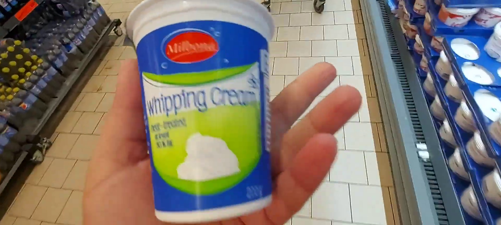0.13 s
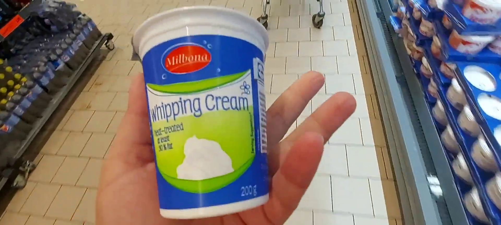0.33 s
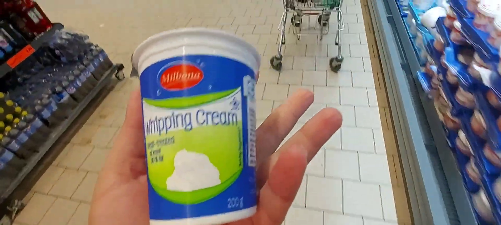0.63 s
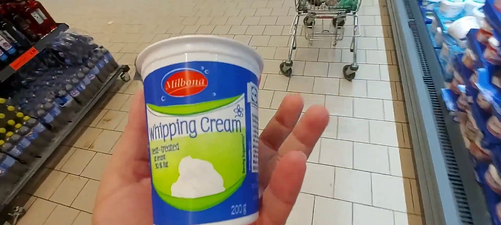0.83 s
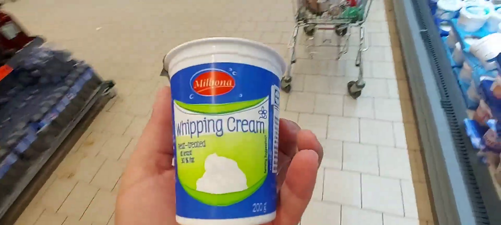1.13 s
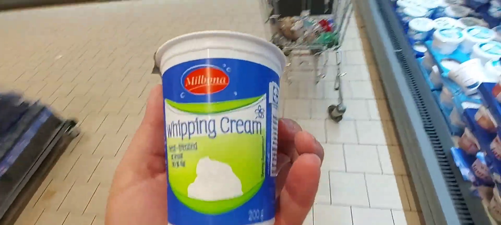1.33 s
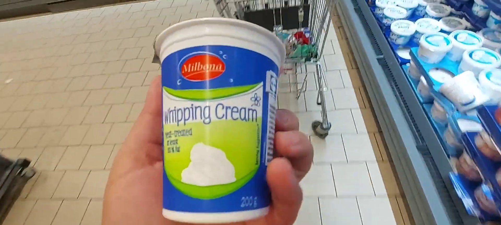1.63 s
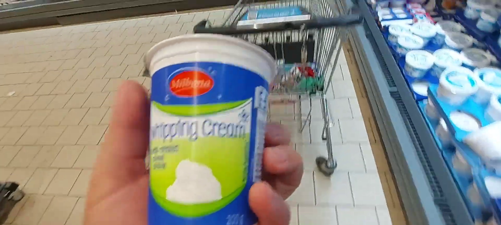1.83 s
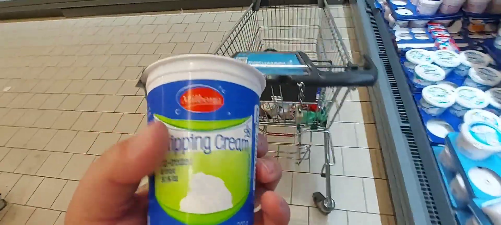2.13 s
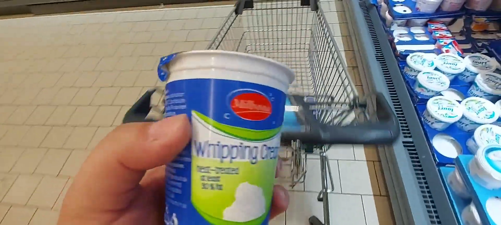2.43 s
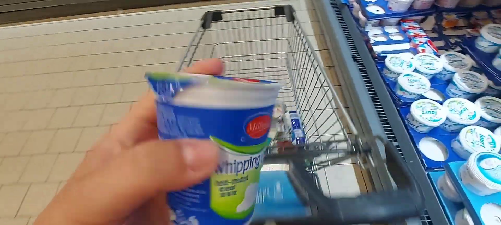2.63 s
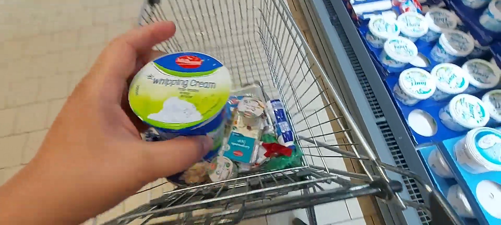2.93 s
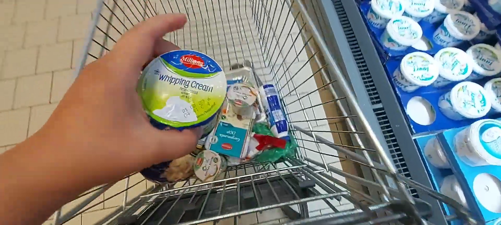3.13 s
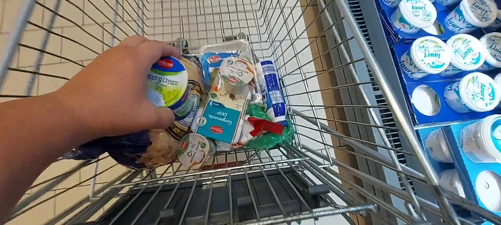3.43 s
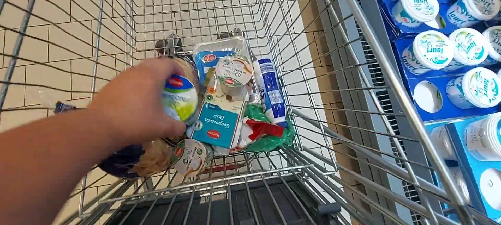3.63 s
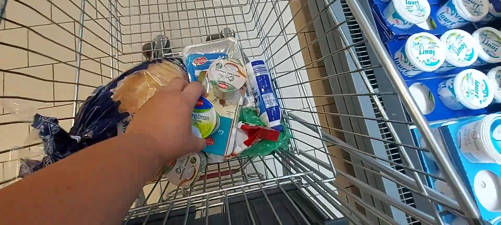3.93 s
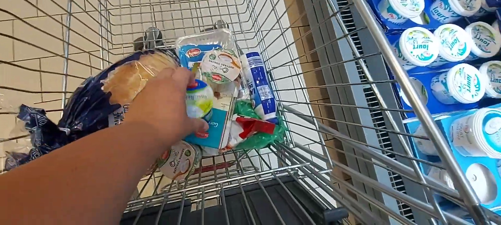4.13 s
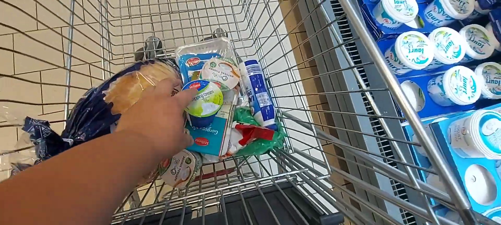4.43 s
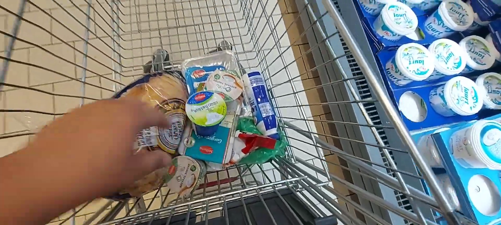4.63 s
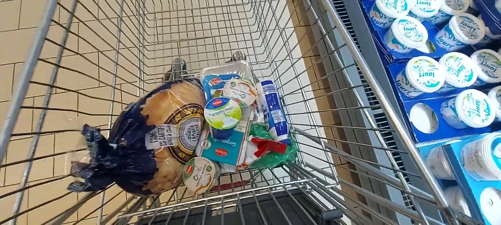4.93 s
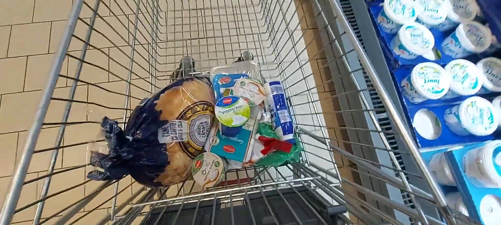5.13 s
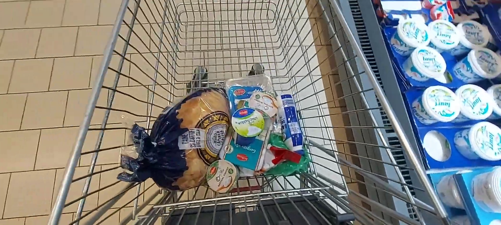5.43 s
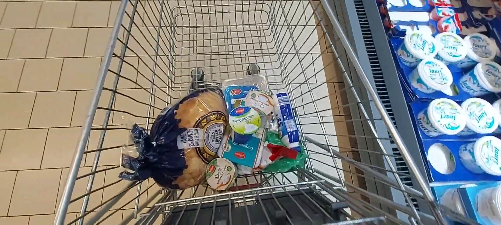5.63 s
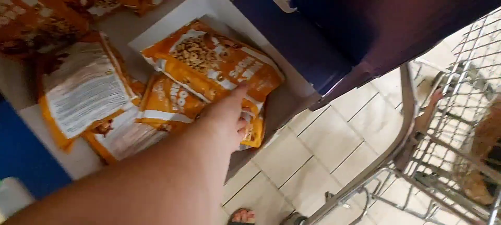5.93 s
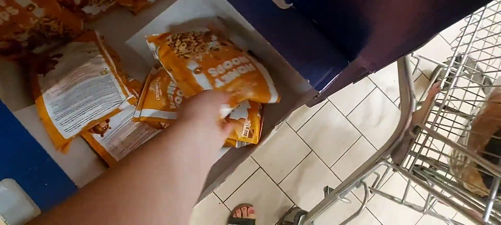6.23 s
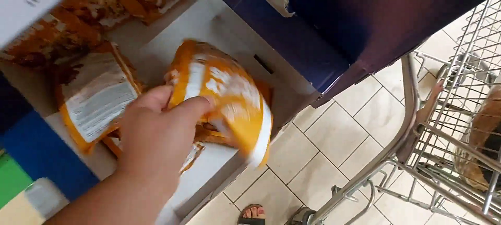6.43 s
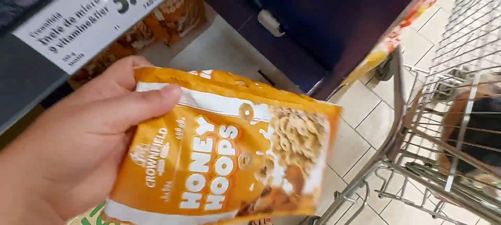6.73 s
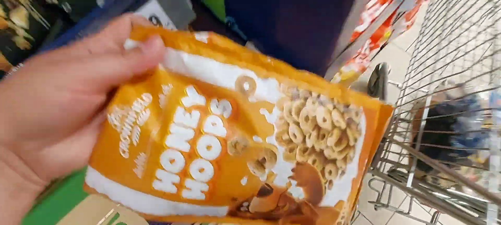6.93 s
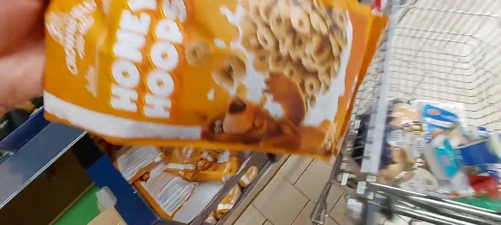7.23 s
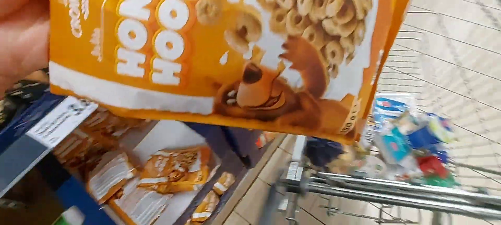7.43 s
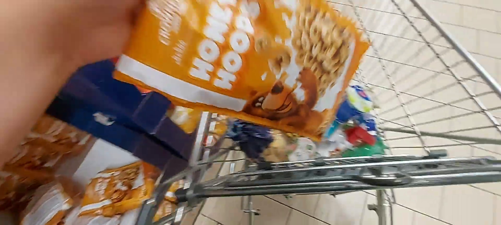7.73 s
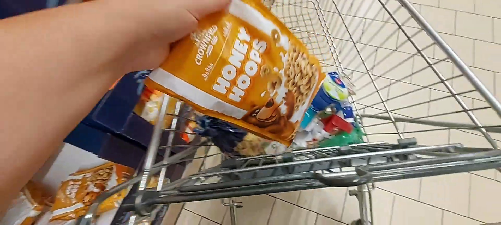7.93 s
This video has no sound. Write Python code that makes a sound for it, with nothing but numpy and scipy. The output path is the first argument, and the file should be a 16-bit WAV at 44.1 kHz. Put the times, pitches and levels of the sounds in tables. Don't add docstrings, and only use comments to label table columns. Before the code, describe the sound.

Low fan drone and chiller air roar in a supermarket aisle, a plastic tub clacks into a wire trolley, then a bag crackles loudly.

```python
import sys
import numpy as np
from scipy import signal
from scipy.fft import rfft, irfft
from scipy.io import wavfile
from scipy.ndimage import uniform_filter1d

SR = 44100
rng = np.random.default_rng(int(sys.argv[2]) if len(sys.argv) > 2 else 0)


def invert_db(level):
    return 10 ** (np.asarray(level, dtype=float) / 20)


def master(y):
    cut = np.clip(np.atleast_2d(y).T, -1, 1)
    pcm = np.round(cut * 32767)
    wavfile.write(sys.argv[1], SR, pcm.astype(np.int16))


N = 356416
TIME = np.arange(N) / SR
FREQ = np.fft.rfftfreq(N, 1 / SR)
HARD_DB = -34


def along_hz(points, hz):
    f, value = np.transpose(points)
    return np.interp(np.log(np.maximum(hz, 1)), np.log(f), value)


def unit(x):
    return x / np.sqrt(np.mean(x ** 2))


def walk(rate):
    k = int(SR / rate)
    held = np.repeat(rng.standard_normal(400), k)[:N]
    return 1.292 * uniform_filter1d(uniform_filter1d(held, k), k)


def sides(db):
    return invert_db(np.array([db, -db]) / 2)


def lag(samples):
    return np.exp(-2j * np.pi * FREQ * samples / SR)


def passing(db, at_s, reach_s):
    stops_s, fall_db = 3.88, 22
    distance = (np.minimum(TIME, stops_s) - at_s) / reach_s
    return db - fall_db * np.log10(1 + distance ** 2)


def swells(rows):
    power = 0
    for s, db, fade_s in rows:
        age = (TIME - s) / fade_s
        power = power + invert_db(db) ** 2 * np.exp(-2 * np.maximum(age, -age / 0.67) ** 1.45)
    return power


def air(colour, alike_hz, flicker_db, tilt_db, ref_hz):
    alike = .65 / (1 + (FREQ / alike_hz) ** 10.0) + .33 / (1 + (FREQ / 4000) ** 1.2)
    mid, side = rfft(rng.standard_normal((2, N))) * np.sqrt([1 + alike, 1.001 - alike])
    both = np.array([(mid + side) * lag(7.8), mid - side]) * colour
    inside = (FREQ > ref_hz[0]) & (FREQ < ref_hz[1])
    both /= np.sqrt(2 * np.sum(abs(both[0, inside]) ** 2)) / N
    out = 0
    for octave in range(10):
        centre = 31.25 * 2 ** octave
        share = np.clip(1 - abs(np.log2(np.maximum(FREQ, 1) / centre)), 0, 1)
        level_db = flicker_db * walk(8) + tilt_db * (centre > 400)
        out = out + irfft(both * share, N) * invert_db(level_db)
    return out


def fans():
    # blade rate in Hz, level in dB when nearest, passed at s, reach of walking in s,
    # moment in s where the pair cancels.
    twin_fans = [(92.25, -22, .4, 1.35, 1.83), (89.95, -24.5, 3.0, 1.05, 1.83),
                 (117.65, -29, 2.9, 2.4, 3.66), (116.62, -35, 2.5, 5.0, 3.66)]
    # blade rate in Hz, then levels in dB of blade orders 1, 2, ..
    other_fans = [
        (54.4, [0]),
        (116.7, [-30, -12.5, -13]),
        (140.1, [2, -2.5, -28, -17.5, -46]),
        (89.8, [-47, 0, -7, -4, -12.5]),
        (92.7, [-40, -9.5, 0]),
        (116, [-40, 0]),
    ]
    # level in dB when nearest, passed at s, reach in s.
    fan_places = [(-40, 1.0, 13), (-30.5, 3.4, 3.4), (-33.5, 2.42, 1.25), (-35, 3.9, 2.4),
                  (-37.5, 0.4, 0.97), (-35.5, 0.67, 0.53)]
    out = 0
    for sign, (hz, *place, opposed_s) in zip((1, -1, 1, -1), twin_fans):
        level = invert_db(passing(*place) + 0.59 * walk(3.68))
        out = out + sign * level * np.sin(2 * np.pi * hz * (TIME - opposed_s))
    for (blade_hz, orders), place in zip(other_fans, fan_places):
        turn = 2 * np.pi * np.cumsum(blade_hz * (1 + 0.00398 * walk(3))) / SR
        near_db = passing(*place) + 1.45 * walk(2.35)
        for k, order_db in enumerate(orders):
            level = invert_db(near_db + order_db + 2.56 * k ** .5 * walk(6))
            out += level * np.sin((k + 1) * turn + k * k)
    late = np.roll(out, 14)
    return np.sqrt(2) * np.array([late, out]) * sides(-1.7)[:, None]


def whine():
    # line in Hz, level in dB, start in s, end in s.
    motor_lines = [(2627, -57, .5, 1.05), (2670, -63, 0, 1.3), (2722, -64, .6, 1.5), (2763, -61, 0, 1.75),
                   (2758, -56, 3.2, 3.7), (2690, -59, 4.6, 5.15), (2676, -59, 2.5, 6.2),
                   (2697, -60, 1.7, 6.2), (2763, -61, 1.9, 3.2), (2680, -59, 2.4, 3.0),
                   (12000, -71, 3.6, 4.6), (2589, -58, 3.7, 6.2), (2789, -59, 3.8, 6.2),
                   (2428, -62, 3.7, 6.2), (2390, -64, 2.0, 2.4), (11100, -69, 2.4, 4.6),
                   (11000, -70, 3.4, 5.3)]
    out = 0
    for hz, db, start, end in motor_lines:
        gate = np.clip(np.minimum(TIME - start, end - TIME) / .15 + .5, 0, 1)
        sag = .012 * (1 - gate) * (TIME > end - .1)
        turn = 2 * np.pi * np.cumsum(hz * (1 + .0004 * walk(25) - sag)) / SR
        ports = np.sin(turn + np.array([[0], [np.pi / 2]]))
        out = out + gate * invert_db(db + 2.6 * walk(7.04)) * ports * np.sqrt(2)
    return out * sides(-5.0)[:, None] * invert_db(1.6)


def grille():
    band = np.exp(-((FREQ - 433) / 112) ** 2)
    ports = np.array([lag(9), lag(0)])
    noise = unit(irfft(rfft(rng.standard_normal(N)) * band * ports, N))
    return invert_db(passing(-40.5, 3.84, 1.15) + 1.5 * walk(3.05)) * noise


def scuffs():
    # time in s, peak level in dB, fade in s.
    steps = [(.66, -64, .06), (.88, -59, 0.046), (1.69, -54, 0.039), (2.31, -50, 0.059), (2.99, -48.5, 0.1),
             (3.24, -52, .03), (3.33, -54, .03), (4.29, -52, 0.036), (4.48, -62, 0.036),
             (4.63, -53.5, 0.063), (5.08, -58, 0.11), (5.23, -59, .05), (5.8, -60, 0.13)]
    cloth = invert_db(passing(-57.5, 3.9, 4.9) + 1.9 * walk(11))
    return np.sqrt(cloth ** 2 + swells(steps))


def chiller():
    # frequency in Hz, level in dB per Hz.
    chiller_air = [(30, -37), (93, -5.5), (177, -11.5), (289, -8), (611, -24.5), (946, -23.5), (1220, -31),
                   (2900, -41), (5000, -51.5), (8100, -49), (9600, -57), (12000, -49), (15750, -53.5),
                   (15900, -85)]
    # frequency in Hz, left minus right in dB.
    chiller_side = [(100, -4), (400, 0.5), (1300, -2), (3000, -4.5), (8000, -12.5), (15000, -8.5)]
    colour = invert_db(along_hz(chiller_air, FREQ)) * sides(along_hz(chiller_side, FREQ))
    buffet_db = 1.4 * walk(14)
    roar = invert_db(passing(-27, 5.65, 13.5) + buffet_db - 2.5) * air(colour, 700.0, 1.0, -buffet_db, (190, 500))
    cloth_colour = colour * (FREQ > 2000) / (1 + (FREQ / 11000) ** 4)
    scuff = scuffs() * invert_db(-2.0) * air(cloth_colour, 800., .8, 0, (3200, 9000))
    return roar + scuff + fans() + whine() + grille()


def jet():
    band = np.exp(-((FREQ - 10990) / np.where(FREQ < 10990, 220, 400)) ** 2)
    band = band + invert_db(-7) * np.exp(-((FREQ - 11800) / 500) ** 2)
    swell_db = 4 * np.clip((TIME - 5.3) / .4 + .5, 0, 1)
    level = invert_db(passing(-55.5, 3.3, 6.0) + swell_db + 1.3 * walk(5.97))
    hiss = unit(irfft(rfft(rng.standard_normal((2, N))) * band, N))
    return level * hiss * sides(0.71)[:, None]


def film(rough_db, top_db):
    # frequency in Hz, level in dB per Hz.
    film_colour = [(180, -59), (300, 0), (379, -8.5), (531, -12.5), (907, -7.5), (1210, -17), (1380, -12),
                   (1630, -12.5), (2170, -13), (6030, -19.5), (7630, -14.5), (9180, -18), (11200, -15.5),
                   (15750, -20), (15900, -38), (17000, -55)]
    part_edges_hz = [250, 1200, 5000, SR]
    roughness = uniform_filter1d(rng.exponential(size=N), size=12)
    grains = rng.standard_normal((2, N)) * invert_db(rough_db * roughness)
    alike = 0.81 / (1 + (FREQ / 1200) ** 4.6) + 0.097
    left, right = rfft(grains) * invert_db(along_hz(film_colour, FREQ) + top_db * (FREQ > 8750))
    tone = np.array([left, alike * left * lag(10.5) + np.sqrt(1 - alike ** 2) * right])
    above = [np.clip(np.log2(np.maximum(FREQ, 1) / hz) / .5 + .5, 0, 1) for hz in part_edges_hz]
    return [unit(irfft(tone * np.sqrt(lo - hi), N)) for lo, hi in zip(above, above[1:])]


def lasting(rows, length_s):
    return [(*row, length_s) for row in rows]


def cracks(rows, spike, tail_db, tail_s, sharp, pan_db):
    lead_s = 0.011
    out, since = np.zeros((2, N + SR)), TIME[:SR // 5] - lead_s
    age = np.maximum(since, 0)
    creak = invert_db(-21) * np.exp(-abs(since) / .0025)
    dull, middle, bright = film(rough_db=8.0, top_db=-1.0)
    for s, db, hz, dull_db, bright_db, length in rows:
        at = int((s - lead_s) * SR)
        burst = np.exp(-(age / max(length, .0007)) ** 1.01)
        burst = burst + spike * np.exp(-age / 0.00089) + invert_db(tail_db - 60 * age / tail_s)
        burst = burst * np.minimum(age / 0.00096, 1) + creak * min(length / 0.0035, 1)
        burst = burst[:N - at]
        span = slice(at, at + len(burst))
        patch = signal.iirpeak(hz, sharp * (0.0038 / length) ** 0.53, fs=SR)
        ring = signal.lfilter(*patch, burst * (middle + bright)[:, span])
        ring = ring + invert_db(-14.) * min(length / .004, 1) ** 2 * burst * middle[:, span]
        parts = ring, burst * dull[:, span], burst * bright[:, span]
        for part, part_db in zip(parts, (0, dull_db, bright_db)):
            out[:, span] += invert_db(db + part_db) * part / abs(part.mean(axis=0)).max()
    return out[:, :N] * sides(pan_db)[:, None]


def tub():
    # time in s, peak in dB, ringing in Hz, dull part in dB, bright part in dB.
    tub_knocks = [(1.667, -35, 2800, -8, -10), (1.676, -36, 2200, -8, -10), (1.685, -35, 3000, -12, -12),
                  (1.691, -36, 4000, -12, -14), (1.704, -42, 3200, -12, -14), (2.991, -31, 1440, -4, -16),
                  (2.998, -35, 2000, -6, -14), (3.2265, -24, 2570, 3.5, -4), (3.2305, -29, 3000, -4, -9),
                  (3.2375, -34, 2600, -6, -10), (5.462, -39, 1398, -8, -13)]
    tub_ticks = [
        (1.6633, -26.5, 2100, 1, -20),
        (2.9025, -33, 2400, -12, -20),
        (3.2088, -28, 3200, 5, -11),
        (3.2135, -24, 1510, -6, -2),
        (3.2497, -36, 2780, -6, -12),
        (3.3748, -27, 6400, -25, -10),
        (3.3746, -30, 3660, -25, -25),
        (4.2848, -30, 4600, 4, 2),
        (5.0975, -40, 3620, -25, -25),
        (5.215, -30, 1900, -9, -23),
    ]
    tub_scrapes = [
        (4.299, -39, 2900, -20, -25),
        (4.318, -39, 3000, -20, -25),
        (4.466, -36, 3100, -20, -25),
        (4.481, -38, 3000, -20, -25),
    ]
    rows = lasting(tub_knocks, .003) + lasting(tub_ticks, .0017) + lasting(tub_scrapes, .014)
    return cracks(rows, spike=0.79, tail_db=-20.0, tail_s=0.2, sharp=2.6, pan_db=-6.5)


def pings():
    # time in s, peak in dB, mode in Hz, t60 in s.
    corner_pings = [(3.3749, -18, 6400, .006), (5.2126, -24, 4150, .006), (5.2125, -21, 3000, .007),
                    (1.663, -27, 1900, .005), (1.6634, -26, 2900, .005), (1.6635, -29, 4000, .005),
                    (3.2093, -17, 2450, .007), (7.558, -26, 1500, .008), (7.5738, -27, 700, .015),
                    (6.8641, -18, 3400, .008), (6.9677, -8, 2650, .009), (6.9686, -15, 3180, 0.006),
                    (7.8629, -24, 1150, .01), (7.8633, -21, 750, .012), (7.863, -29, 1550, .008),
                    (7.036, -29, 420, .025), (7.2623, -34, 900, .012), (7.6753, -28, 800, .012)]
    further_pops = [(6.0849, -19, 8140, .004), (6.09, -12, 3420, .005), (6.1066, -17, 3530, .005),
                    (6.1164, -16, 13000, .003), (6.1178, -16, 5430, .005), (6.1576, -7, 12900, .003),
                    (6.1655, -20, 4350, .005), (6.1694, -22, 8230, .004), (6.1695, -24, 4180, .005),
                    (6.2288, -6.5, 8140, .005), (6.2314, -17, 3450, .006), (6.2906, -25, 4000, .005),
                    (6.312, -16, 7970, .005), (6.3292, -22, 2800, .006), (6.3998, -12, 8070, .006),
                    (6.4125, -9, 12100, .004), (6.4824, -25, 3450, .005), (6.4847, -20, 3020, .006),
                    (6.5344, -8, 4250, .006), (6.5735, -18, 8960, .004), (6.584, -23, 7190, .004),
                    (6.6132, -24, 3270, .005), (6.6359, -26, 3060, .005), (6.7439, -19, 3270, .006),
                    (6.7513, -11, 4100, .006), (6.7511, -15, 7590, .005), (6.7942, -17, 2900, .006),
                    (6.8649, -10, 8230, .004), (6.8737, -23, 3530, .005), (6.8762, -16, 3890, .005),
                    (6.9041, -13, 2540, .007), (3.2272, -26, 8600, .005), (3.2295, -26, 4200, .005),
                    (3.3749, -17, 3700, .006), (3.3749, -19, 7500, .005), (4.2857, -18, 4200, .006),
                    (4.2851, -20, 5700, .005), (3.3749, -21, 5400, .005), (2.9915, -28, 1250, .006),
                    (2.9918, -25, 2000, .006), (3.2092, -28, 3700, .005), (6.9682, -22, 3900, .005),
                    (6.9674, -23, 5600, .005), (6.6452, -17, 1900, .006), (6.6125, -19, 1500, .008),
                    (4.2862, -27, 8000, .006), (4.2878, -25, 3400, .006)]
    # time in s, peak in dB, mode in Hz.
    corner_notes = [(1.6636, -26, 4300), (3.2272, -19, 1500), (3.2292, -22, 2500), (3.2301, -20, 800),
                    (3.2503, -29, 3800), (3.3748, -21, 12000), (3.3535, -37, 5500), (4.185, -33, 8000),
                    (4.2878, -28, 2400), (5.0982, -28, 3800), (5.9765, -27, 1500), (6.096, -18, 1500),
                    (6.1025, -11, 5500), (6.1191, -14, 3700), (6.1572, -18, 1500), (6.1731, -11, 5800),
                    (6.2436, -8, 12000), (6.2724, -17, 2500), (6.2782, -8, 5800), (6.3484, -26, 1500),
                    (6.4051, -12, 12000), (6.4049, -16, 5800), (6.405, -19, 800), (6.4695, -20, 3700),
                    (6.584, -16, 3700), (6.6453, -13, 12500), (6.6599, -16, 3700), (6.6711, -20, 3700),
                    (6.7038, -23, 750), (6.7058, -25, 1500), (6.743, -19, 1500), (6.8186, -25, 3700),
                    (6.8288, -22, 7500), (6.8618, -24, 4000), (6.8765, -6, 5500), (6.9037, -21, 3700),
                    (6.9226, -28, 2400), (7.2112, -32, 750), (7.2134, -30, 2500), (7.316, -38, 1800),
                    (7.5587, -29, 3600), (6.8013, -19, 5500), (6.8284, -19, 12000), (6.9045, -10, 12000),
                    (6.6461, -20, 5500), (6.3101, -13, 3700), (6.4015, -20, 800), (6.5346, -12, 12000),
                    (6.5343, -12, 5600), (7.5716, -34, 2500), (5.4625, -33, 3600), (2.9925, -30, 3600),
                    (6.6718, -22, 2500), (6.8289, -21, 3700)]
    notes_t60 = [(*row, .0035 + 6 / row[2]) for row in corner_notes]
    out, age = np.zeros((2, N + SR)), TIME[:SR // 20]
    for s, db, hz, t60 in corner_pings + further_pops + notes_t60:
        ring = np.sin(2 * np.pi * hz * age + np.array([[0], [1.2]]))
        ring = invert_db(db - 60 * age / t60) * np.minimum(age / 0.00047, 1) * ring
        out[:, int(s * SR):][:, :len(age)] += ring
    return out[:, :N]


def thumps():
    # time in s, peak in dB, lower mode in Hz, t60 in s.
    bumps = [(6.022, -18.5, 260, 0.07), (6.599, -22, 102, 0.11), (6.639, -22, 234, 0.046),
             (6.749, -9.5, 190, 0.03), (7.034, -19.5, 323, 0.054), (7.259, -31, 147, 0.1),
             (7.573, -39, 102, 0.052), (7.672, -34, 244, 0.06), (7.861, -35, 148, 0.048),
             (7.937, -25, 212, 0.078), (7.969, -30, 380, 0.037), (8.0, -32, 380, .04),
             (6.91, -28, 420, .03)]
    out, age = np.zeros(N + SR), TIME[:SR // 5]
    for s, db, hz, t60 in bumps:
        ring = np.sin(2 * np.pi * hz * age)
        ring = ring + 0.47 * np.sin(2 * np.pi * 1.86 * hz * age) * np.exp(-age / 0.0052)
        ring = invert_db(db - 1.0 - 60 * age / t60) * np.minimum(age / 0.0013, 1) * ring
        out[int(s * SR):][:len(age)] += ring
    return out[:N]


def hum(rumble):
    # frequency in Hz, level in dB per Hz.
    aisle_air = [(21, -51), (35, -19), (86, 1), (177, -6), (207, -8.5), (229, -3.5), (523, -19.5),
                 (2580, -68), (2940, -32), (3520, -40), (4550, -38), (14900, -57), (16500, -69)]
    # blade tone in Hz, level in dB.
    far_fans = [(86, -50), (140, -42), (253, -51)]
    colour = invert_db(along_hz(aisle_air, FREQ)) * (FREQ < 700)
    out = np.sqrt(invert_db(-40.5) ** 2 + rumble) * air(colour, 650.0, 1.6, 0, (50, 450))
    for hz, db in far_fans:
        out += invert_db(db + 2.0 * walk(4.9)) * np.sin(2 * np.pi * hz * TIME)
    return (out + thumps()) * sides(-0.9)[:, None]


def grip():
    # time in s, level in dB.
    rustle_grip = [
        (5.94, -42),
        (6.03, -40),
        (6.12, -32),
        (6.38, -33.5),
        (6.44, -46.5),
        (6.53, -35.5),
        (6.74, -34.5),
        (6.85, -47),
        (6.95, -47.5),
    ]
    settle_grip = [
        (7.1, -49),
        (7.26, -53.5),
        (7.58, -52.5),
        (7.75, -46),
        (7.87, -46.5),
        (8.08, -48.5),
    ]
    return np.interp(TIME, *np.transpose(rustle_grip + settle_grip))


def rustle(grip_db, rumble):
    dull, middle, bright = film(rough_db=8.5, top_db=-5.0)
    grip_db = grip_db + 1.3 * walk(40)
    dull_gain = np.sqrt(invert_db(-37 + 1.1 * (grip_db - HARD_DB)) ** 2 + invert_db(-11.0) ** 2 * rumble)
    bright_gain = invert_db(-37.5 + 1.1 * (grip_db - HARD_DB))
    return dull_gain * dull + invert_db(grip_db) * middle + bright_gain * bright


def creases(rows, length_s):
    out = []
    for s, db, hz, bright_db in rows:
        dull_db = -6.5 - 6.5 * np.log2(hz / 2530) - 0.38 * bright_db
        out.append((s, db, hz, dull_db, bright_db, length_s))
    return out


def bag():
    # time in s, peak in dB, ringing in Hz, bright part in dB.
    grab_cracks = [(5.9625, -27, 3330, -15), (5.9758, -19, 3200, -6), (6.0018, -29, 1420, -19),
                   (6.0272, -27, 3280, -19), (6.0474, -14, 2280, -11), (6.0741, -19, 3520, -10),
                   (6.0844, -24, 2420, 2), (6.1017, -15, 2030, -2), (6.114, -12, 1870, 0),
                   (6.1245, -16, 4930, 2), (6.1576, -17.5, 2800, 3), (6.1716, -18.5, 2080, 4),
                   (6.24, -17, 3820, 1), (6.2452, -20, 3690, -13), (6.2694, -16, 4000, 5),
                   (6.2778, -17, 2990, 0), (6.2983, -23, 4690, 8), (6.305, -18, 4440, -6),
                   (6.3104, -23, 3670, 4), (6.326, -18, 2100, 3), (6.4042, -19, 2200, 0),
                   (6.412, -18, 3060, -10)]
    lift_cracks = [(6.4696, -22, 2030, -1), (6.481, -24, 1460, -4), (6.534, -14, 3880, -1.5),
                   (6.559, -20, 3150, -11), (6.567, -17.5, 4900, -3), (6.573, -21.5, 3290, 4.5),
                   (6.6125, -22, 1870, -18), (6.6296, -23, 2920, -5), (6.6455, -15, 2050, -10),
                   (6.656, -32, 3680, -10), (6.6712, -24, 4800, 8), (6.703, -16, 5000, -8),
                   (6.7104, -20, 3280, -5), (6.7268, -19, 3790, 1), (6.7494, -15.5, 1470, 4.5),
                   (6.7936, -27, 2200, -9), (6.8, -28, 2820, -4), (6.8205, -20.5, 2570, -1.5),
                   (6.8285, -26, 3580, -4), (6.865, -20.5, 3270, 2), (6.876, -15, 3820, -1),
                   (6.904, -23, 2430, 0), (6.911, -36, 2280, -3)]
    long_tears = [
        (6.0894, -10, 3580, 0.5),
        (6.2274, -18, 5000, 3.5),
        (6.3983, -24, 2400, 12),
        (6.7381, -15.5, 3000, 2.5),
    ]
    small_flicks = [(6.0519, -28, 4500, 2), (6.0745, -22, 5200, 0), (6.1454, -33, 4000, 6),
                    (6.1631, -24, 4000, 5), (6.193, -31, 4000, 6), (6.2023, -31, 4500, 6),
                    (6.2342, -25, 4500, 7), (6.3469, -34, 4000, 10), (6.3682, -34, 4000, 9),
                    (6.3935, -32, 4000, 7), (6.5103, -37, 4000, 7), (6.5236, -32, 4000, 8),
                    (6.5377, -24, 5000, 1), (6.5613, -30, 4200, -1), (6.5836, -30, 4800, 3),
                    (6.6164, -43, 4000, 7), (6.6383, -31, 4000, 9), (6.6598, -28, 3500, 0),
                    (6.7161, -29, 5200, 2), (6.7342, -27, 4500, 8), (6.7475, -24, 3000, 1),
                    (6.7675, -25, 3000, -5), (6.8612, -34, 3500, -2), (6.8712, -31, 4500, 8)]
    # time in s, peak in dB, ringing in Hz, dull part in dB, bright part in dB.
    bag_taps = [
        (7.034, -49, 1250, 15, -10),
        (7.2103, -36, 2520, -2, -1),
        (7.2623, -39.5, 1370, 8, -18),
        (7.3043, -38, 2130, -15, -15),
        (7.572, -38, 1280, 4, -17),
        (7.625, -41, 4710, -11, 3),
        (7.6752, -40, 1300, 7.5, -11),
        (7.863, -36, 1210, 6.5, -26),
    ]
    bag_snaps = [
        (6.5012, -21, 4430, -12, 3),
        (6.682, -17.5, 4080, -12, 7),
        (6.8645, -17, 3780, -33, -5),
        (6.9358, -31, 3330, -17, 0),
        (6.9684, -19, 2740, -29, -8),
        (7.5581, -30, 2400, 0, -27),
    ]
    rows = creases(grab_cracks + lift_cracks, 0.0054) + creases(long_tears, 0.014)
    rows += creases(small_flicks, 0.0024) + lasting(bag_taps, 0.0063) + lasting(bag_snaps, 0.0021)
    return cracks(rows, spike=2.94, tail_db=-31.5, tail_s=0.13, sharp=2.4, pan_db=0.0)


def slide():
    # time in s, peak in dB, fade in s.
    slips = [
        (7.08, -47.5, .14),
        (7.775, -44, 0.14),
        (8.05, -60, 0.052),
    ]
    band = FREQ ** 2 / (FREQ ** 2 + 2200 ** 2) / (1 + (FREQ / 8800) ** 8) * (FREQ < 15850)
    hiss = unit(irfft(rfft(rng.standard_normal((2, N))) * band, N))
    return np.sqrt(swells(slips)) * invert_db(2.4 * walk(30)) * hiss


def aisle():
    grip_db = grip()
    handling = invert_db(-36 + 0.4 * (grip_db - HARD_DB)) ** 2
    lowered = invert_db(-36) ** 2 * np.clip((TIME - 7.9) / 0.032, 0, 1)
    rumble = handling + lowered
    return hum(rumble) + rustle(grip_db, rumble) + bag() + slide()


def scene():
    first = chiller() + jet() + tub()
    fade_out = np.clip((5.879 - TIME) / 0.0016, 0, 1)
    fade_in = np.clip((TIME - 5.939) / 0.0047, 0, 1)
    return first * fade_out + aisle() * fade_in + pings()


def top_cut(x):
    return signal.sosfilt(signal.butter(12, 16830, fs=SR, output="sos"), x)


def record(dry):
    rounded = 0.91 * np.tanh(dry / 0.91)
    return top_cut(rounded)


dry = scene()
out = record(dry)
master(out)
```